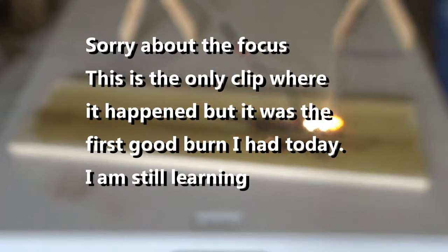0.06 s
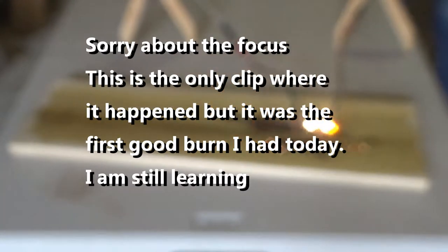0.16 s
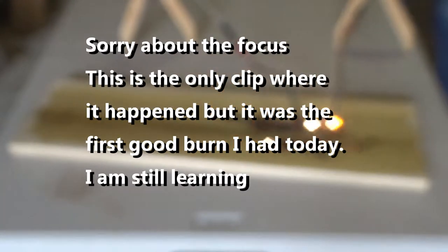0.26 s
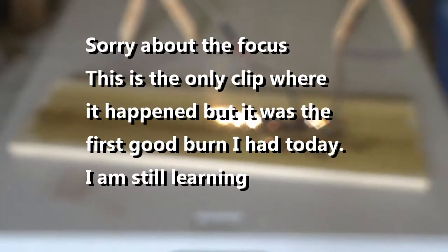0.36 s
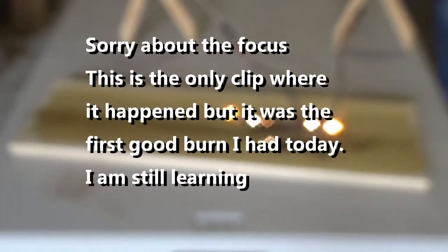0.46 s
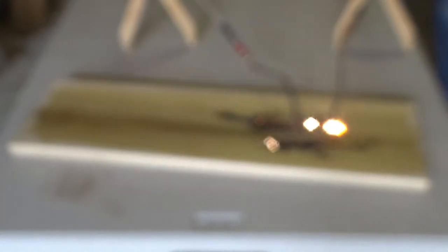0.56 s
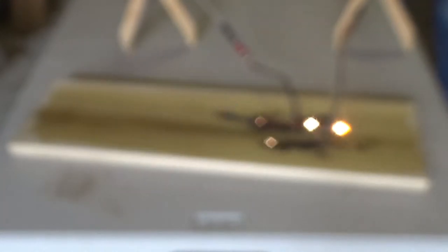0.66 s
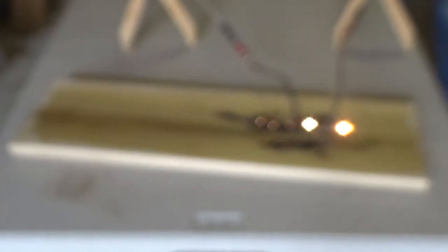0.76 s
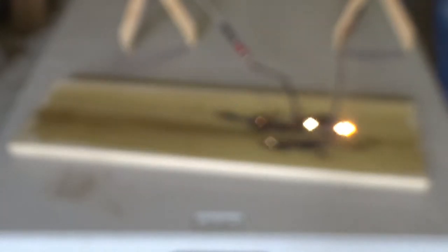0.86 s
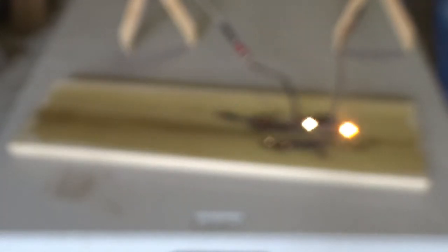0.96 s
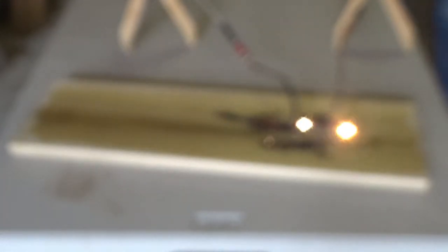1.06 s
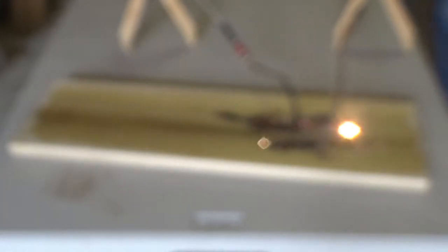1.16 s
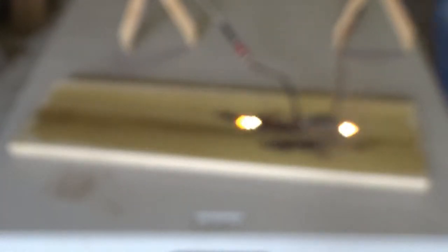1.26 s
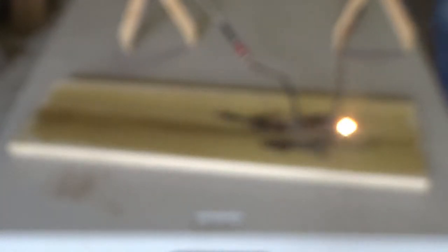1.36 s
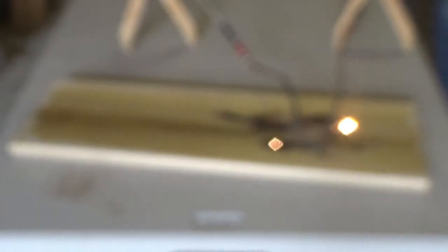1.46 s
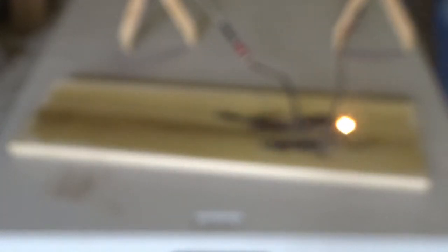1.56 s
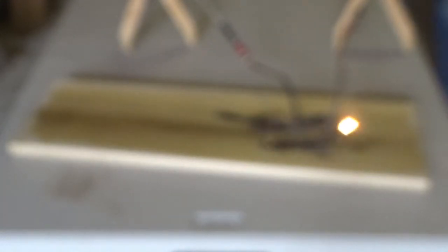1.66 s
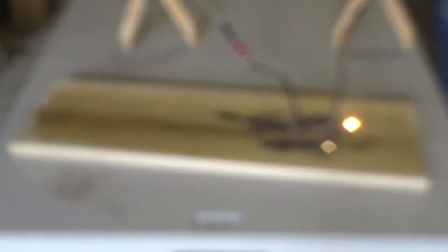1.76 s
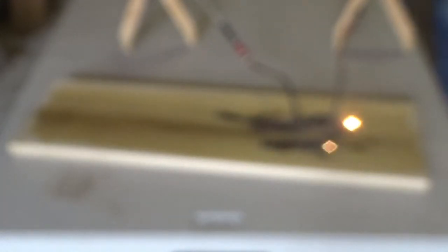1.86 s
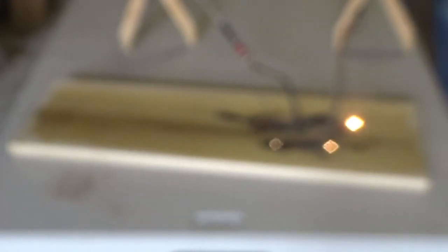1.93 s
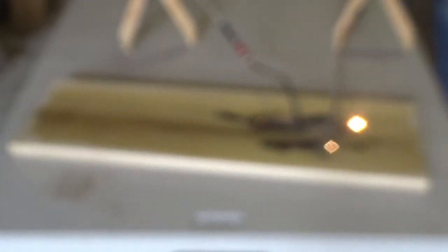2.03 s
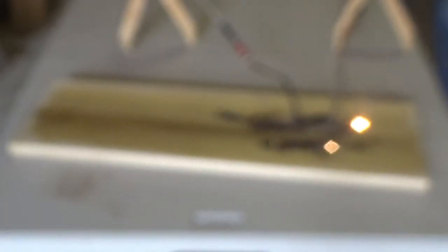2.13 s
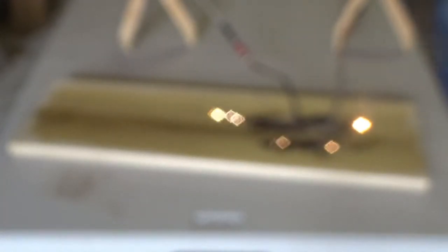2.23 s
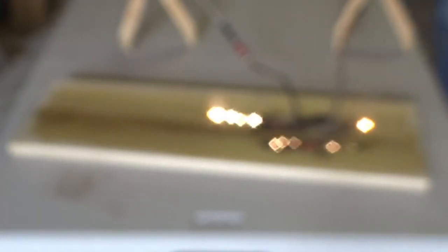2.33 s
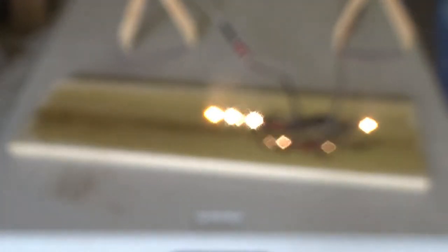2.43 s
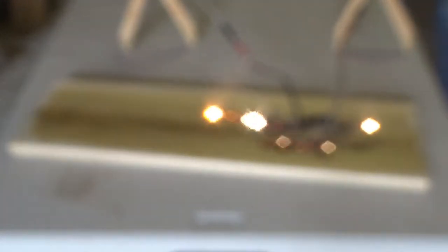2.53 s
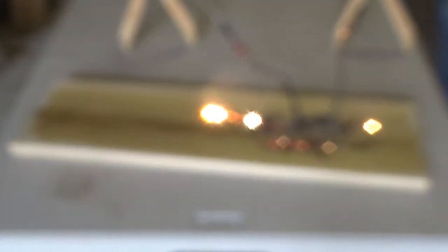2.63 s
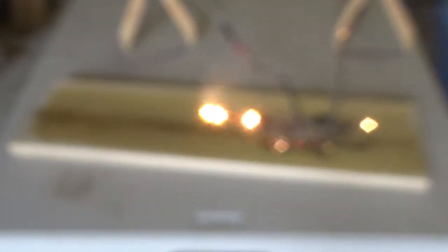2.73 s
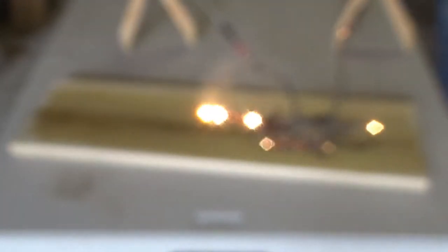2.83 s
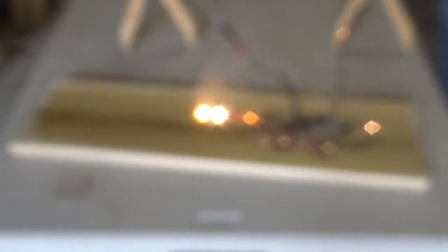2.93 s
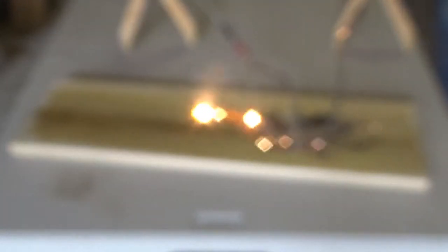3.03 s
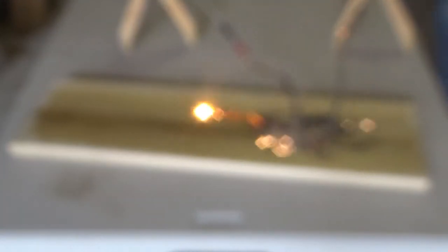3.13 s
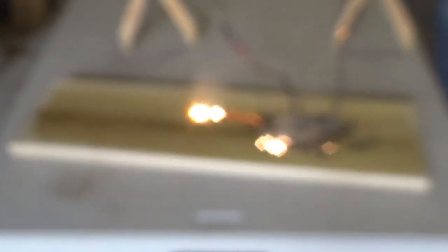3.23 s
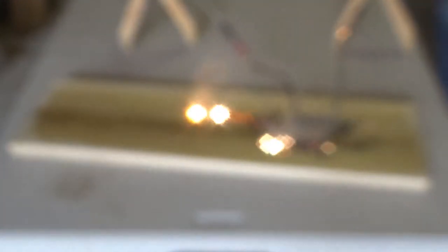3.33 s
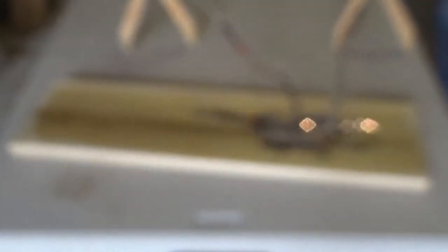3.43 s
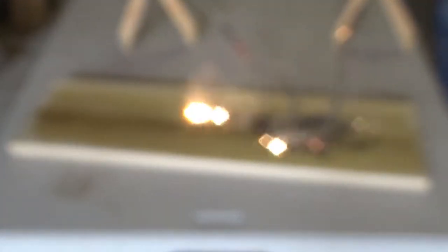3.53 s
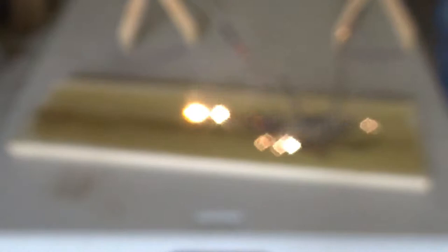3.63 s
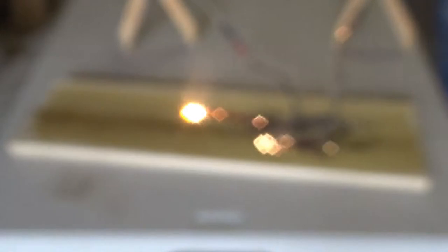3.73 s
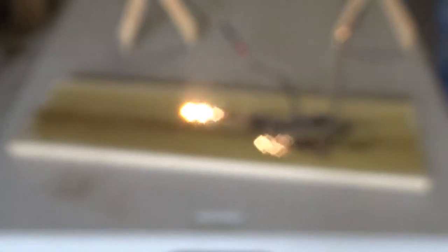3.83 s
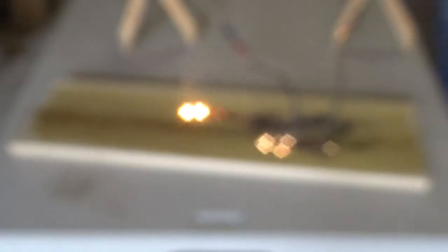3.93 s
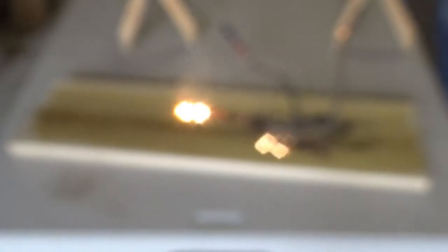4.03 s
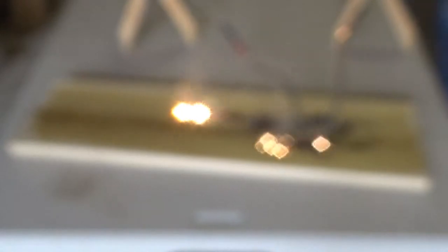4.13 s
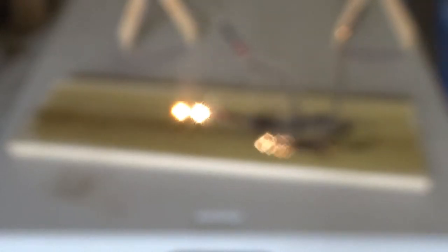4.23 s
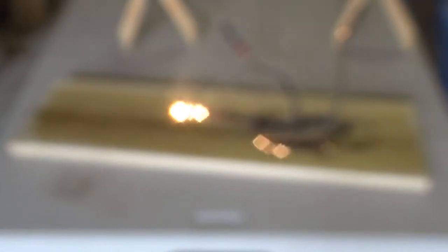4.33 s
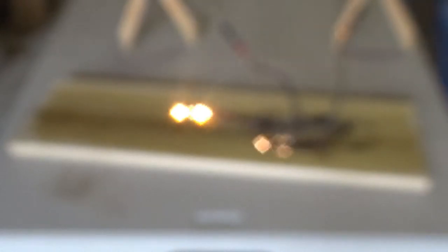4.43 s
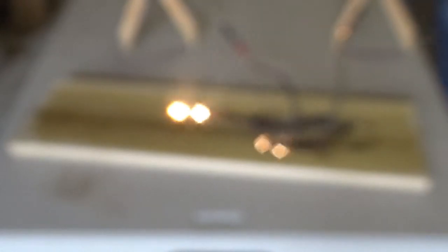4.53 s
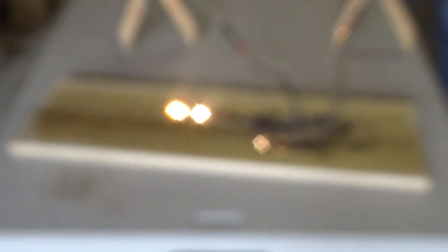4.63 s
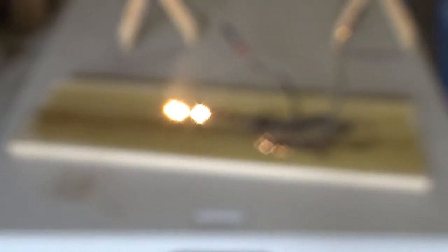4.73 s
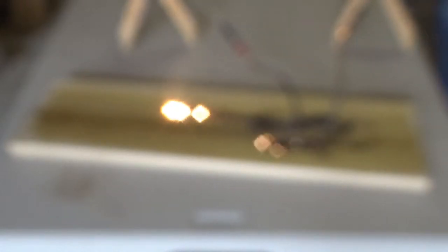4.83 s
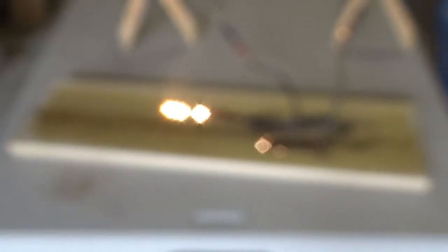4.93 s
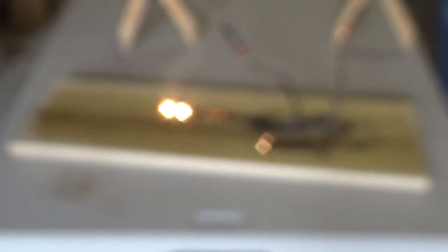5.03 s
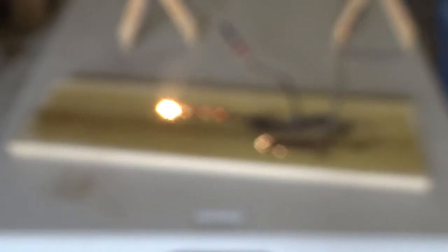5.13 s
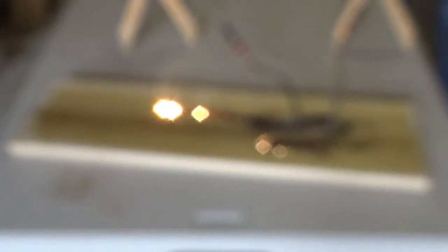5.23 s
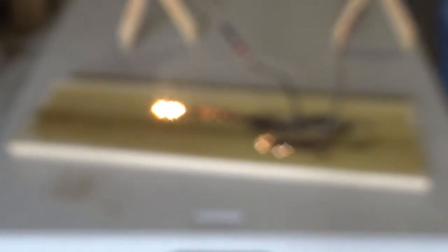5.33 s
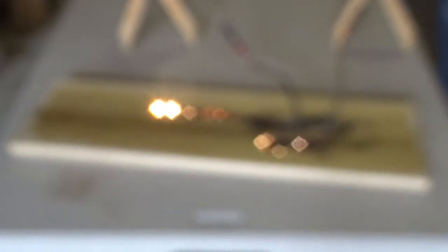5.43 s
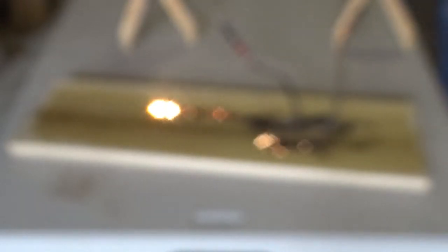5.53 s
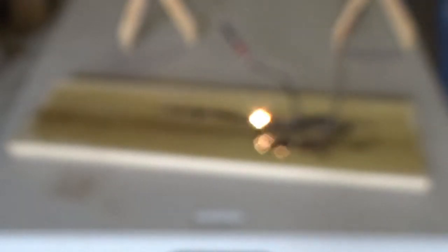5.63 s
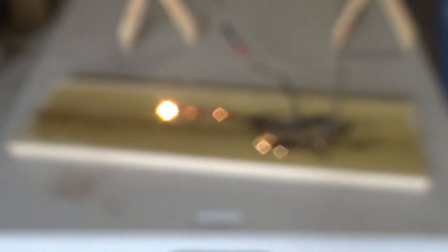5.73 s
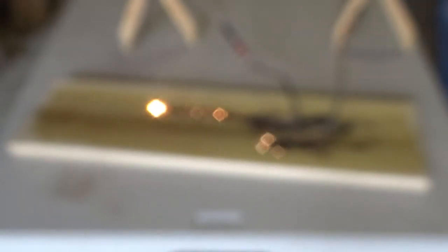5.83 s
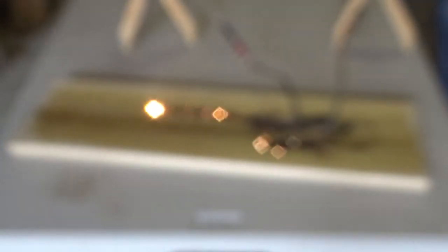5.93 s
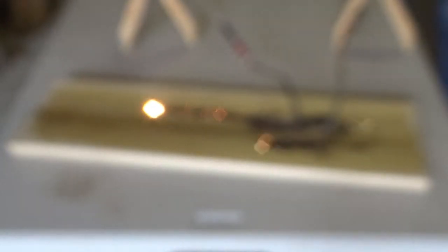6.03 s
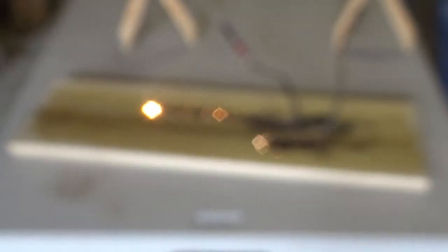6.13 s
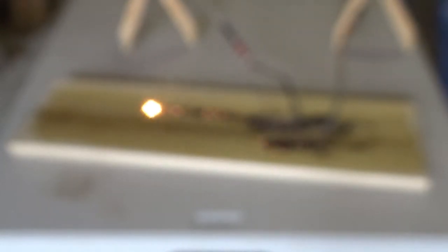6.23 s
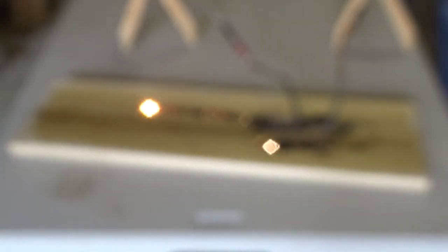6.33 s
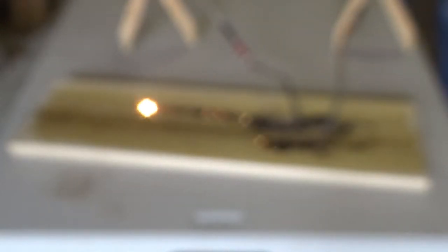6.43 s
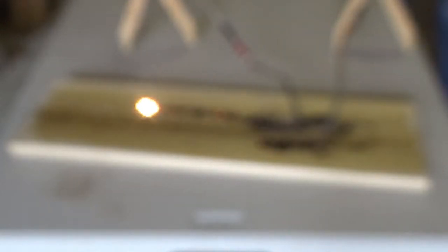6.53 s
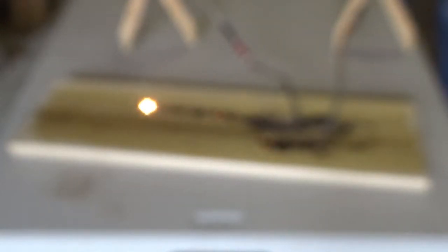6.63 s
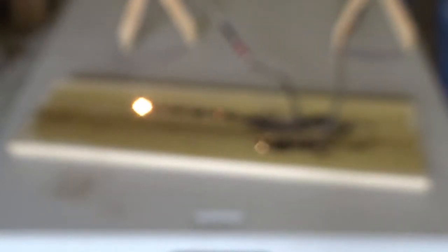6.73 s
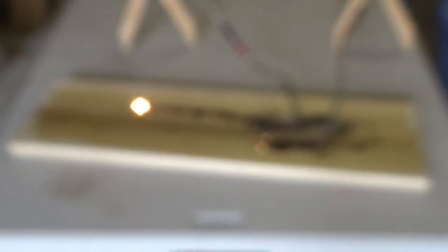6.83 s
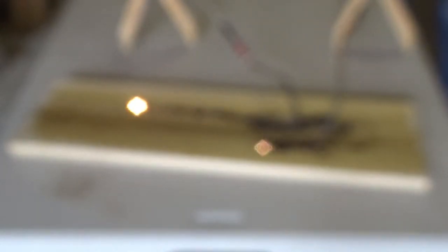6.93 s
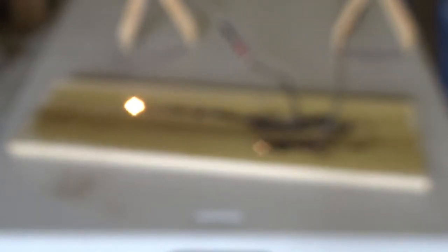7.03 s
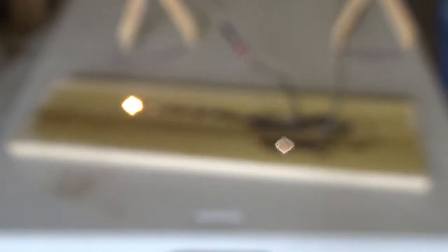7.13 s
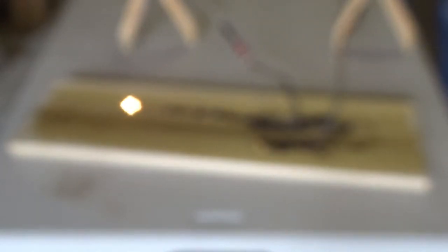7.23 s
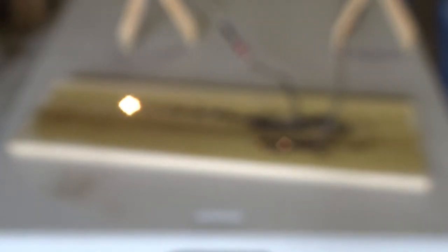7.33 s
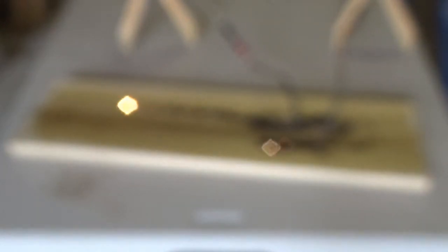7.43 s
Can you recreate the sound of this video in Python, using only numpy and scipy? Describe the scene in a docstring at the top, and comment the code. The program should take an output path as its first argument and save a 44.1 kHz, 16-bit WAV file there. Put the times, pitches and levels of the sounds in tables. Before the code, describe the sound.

In a small workshop, a high-voltage arc burns a wet board, heard close up. A steady, harsh electrical buzz carries bright, rapidly pulsing steam hiss and duller boiling sputter. Sharp tiny snaps pop irregularly. It eases, surges around two and a half seconds, drops out for an instant midway, restarts, then slowly weakens, leaving transformer hum over soft shop noise, low rumble and faint distant whines.

```python
"""A small workshop, where high voltage burns a track through a wet wooden board.
The arc buzzes as tones locked to its supply, and puffs of filtered noise and ticks make the hissing steam.
Duller noise is water boiling in the wood; millisecond bursts of noise are snaps in the char.
The arc goes out for an instant midway and dies down at the end, while the transformer hums on.
Behind it lie even shop noise, low rumble, soft thumps and faint gliding whines far off."""
import sys
import numpy as np
from scipy import signal
from scipy.fft import rfft, irfft
from scipy.io import wavfile

SR = 44100
rng = np.random.default_rng(int(sys.argv[2]) if len(sys.argv) > 2 else 0)


def unload_wav(signal):
    """Save mono or channel-first audio to the path in sys.argv[1] as 16-bit WAV at rate SR, clipped to [-1, 1]."""
    wavfile.write(
        sys.argv[1],
        SR,
        np.round(np.clip(np.atleast_2d(signal).T, -1, 1) * 32767).astype(np.int16),
    )


N = 329427

SUPPLY_HZ = 240
USUAL_BUZZ_DB, USUAL_HISS_DB = -53, -40   # reference levels that the arc's ups and downs are counted from


def from_db(db):
    """Turn decibels into an amplitude factor."""
    return 10 ** (np.asarray(db) / 20)


def rms_one(x):
    """Scale a sound to an rms level of 1."""
    return x / np.sqrt(np.mean(x ** 2) + 1e-20)


def seconds():
    """The time of every sample."""
    return np.arange(N) / SR


def in_time(rows):
    """The columns of a table, joined by straight lines in time."""
    s, *columns = np.transpose(rows)
    return [np.interp(seconds(), s, c) for c in columns]


def drift(rate_hz):
    """Slow random wandering of spread 1: noise smoothed twice, worked out at every 40th sample."""
    step = 40
    r = np.exp(-2 * np.pi * rate_hz * step / SR)
    noise = rng.standard_normal(N // step + 2002)
    slow = signal.lfilter([1], [1, -2 * r, r * r], noise)[2000:]   # skip the filter's start
    return np.interp(np.arange(N) / step, np.arange(len(slow)), rms_one(slow))


def colour(x, spectrum):
    """Filter with the given spectrum that answers as early as it can (minimum phase)."""
    hz, db = np.transpose(spectrum)
    grid = np.maximum(np.linspace(0, SR / 2, 2049), 1)
    gain = from_db(np.interp(np.log(grid), np.log(hz), db))
    cepstrum = irfft(np.log(gain))
    # folding the cepstrum onto its first half moves the energy to the front
    folded = rfft(2 * cepstrum[:len(grid)], len(cepstrum)) - cepstrum[0]
    response = irfft(np.exp(folded))
    return signal.fftconvolve(x, response)[:N]


def resonate(x, hz, width_hz):
    """One resonance with a gain of about 1 at its top."""
    r = np.exp(-np.pi * width_hz / SR)
    feed = np.array([1, 0, -1]) * (1 - r * r) / 2
    back = [1, -2 * r * np.cos(2 * np.pi * hz / SR), r * r]
    return signal.lfilter(feed, back, x + 1e-18)


def stereo_noise(spectrum, side_db):
    """Background noise, nearly alike on both sides."""
    mid, side = (rms_one(colour(rng.standard_normal(N), spectrum)) for _ in range(2))
    return mid + from_db(side_db) * side * [[1], [-1]]


def background(buzz_db):
    """Even shop noise, a low rumble that sinks with the arc, soft thumps, and a separate faint hiss on each side."""
    # spectrum of the shop noise: f/Hz, relative level/dB
    shop_spectrum = [(25, -11), (70, -12), (100, -3.5), (125, -6), (190, -1), (300, 2.5), (600, 2),
                     (1100, -1), (2300, 1.5), (4000, 0), (6500, -22), (15000, -30)]
    # soft low thumps: t/s, level/dB
    thump_rows = [(1.7, -72), (2.88, -69), (3.14, -69), (4.0, -69), (4.17, -64), (4.37, -65), (5.14, -66),
                  (5.56, -64), (6.1, -65)]
    rumble_spectrum = [(25, -21), (85, -7), (130, 22), (220, -7), (600, -35)]   # f/Hz, relative level/dB
    thump_spectrum = [(25, -5), (70, 5), (150, 4), (260, -4), (600, -49)]

    rumble_db = -76.5 + 0.28 * (buzz_db - USUAL_BUZZ_DB) + 1.9 * drift(5)
    rumble = from_db(rumble_db) * stereo_noise(rumble_spectrum, side_db=-24)
    swells = sum(from_db(db) * np.exp(-((seconds() - s) / 0.034) ** 2) for s, db in thump_rows)
    swells = swells + from_db(-83 + 5 * drift(5))   # weaker thumps at random
    thumps = swells * stereo_noise(thump_spectrum, side_db=-14)
    shop = from_db(-56) * stereo_noise(shop_spectrum, side_db=-17)
    faint_hiss = from_db(-61) * rng.standard_normal((2, N))
    return rumble + thumps + shop + faint_hiss


def whines():
    """Faint gliding tones that fade in and out, wavering in level and pitch."""
    # far-off whines, one list each: t/s, f/Hz, relative level/dB
    glides = [
        [(.2, 372, -66), (.75, 425, -64), (1.15, 467, -73), (1.4, 512, -62), (1.75, 560, -75)],
        [(.28, 572, -63), (.6, 585, -60), (.8, 572, -63), (1.2, 550, -70)],
        [(1.9, 460, -66), (2.08, 435, -64), (2.55, 458, -62), (2.9, 461, -63)],
        [(3.2, 382, -71), (4.2, 369.4, -67), (5.2, 366, -70), (6.4, 370, -65), (7.3, 365, -66)],
    ]
    fade_s = 0.069
    out = 0
    for rows in glides:
        hz, db = in_time(rows)
        to_nearest_end_s = np.minimum(seconds() - rows[0][0], rows[-1][0] - seconds())
        fade = np.clip(to_nearest_end_s / fade_s, 0, 1)
        level = fade * from_db(db + 2.2 * drift(7.6))
        turns = np.cumsum(hz + 1.43 * drift(10.5)) / SR
        out = out + level * np.sqrt(2) * np.sin(2 * np.pi * turns)
    return out


def room(x):
    """Countless echoes blur into noise that follows the power of each band and dies quickly."""
    # the blurred tail by band: from f/Hz, to f/Hz, level shared by both sides/dB, level differing between them/dB
    tail_bands = [(307, 1530, -20, -14), (1360, 5000, -8, -16), (3800, 8200, -12, -13),
                  (8350, 15000, -14, -10)]
    t60_s = 0.16   # time for the tail to fall by 60 dB
    out, keep = 0, from_db(-120 / (t60_s * SR))   # acts on power, so 120 here makes 60 dB
    for low, high, mid_db, side_db in tail_bands:
        band = signal.butter(2, [low, high], "band", fs=SR, output="sos")
        power = signal.lfilter([1 - keep], [1, -keep], signal.sosfilt(band, x) ** 2)
        mid, side = rms_one(signal.sosfilt(band, rng.standard_normal((2, N))))
        out = out + np.sqrt(power) * (from_db(mid_db) * mid + from_db(side_db) * side * [[1], [-1]])
    return out


def bench(x, count=14):
    """A few early echoes off the board and the bench comb the hiss with fine ridges."""
    lags_s = rng.uniform(.0008, .012, count)
    response = np.zeros(SR // 20)
    response[(lags_s * SR).astype(int)] = rng.choice([-1, 1], count) * np.exp(-lags_s / 0.023)
    echoes = signal.oaconvolve(x, response / np.linalg.norm(response))[:N]
    return from_db(-.9) * (x + .36 * echoes)


def partial(multiple, flutter_db):
    """A tone locked to the supply, fluttering in level."""
    turns = np.round(multiple) * SUPPLY_HZ * seconds() + rng.random()
    return np.sqrt(2) * np.sin(2 * np.pi * turns) * from_db(flutter_db * drift(20.6))


def hum(buzz_db, flame_db, alight):
    """Arc and transformer swell twice a cycle, so even multiples lead; a tall flame feeds the fourth, starves the eighth."""
    # leading partials: multiple of the supply, level at the usual burn/dB, change per dB of buzz/dB,
    # change per dB of flame/dB, change per second as the track grows/dB
    leading = [(2, -53, 1, 0, 0), (4, -55.5, 0, 1, 0), (6, -51.5, 0.9, -0.2, 0.42),
               (8, -55.5, 0.87, -0.53, 0), (10, -54, .6, 0.02, 0.1), (12, -60, 1.5, -.5, 1.14),
               (14, -55.5, 0, .53, 0.37)]
    # faint partials: multiple of the supply, level at the usual buzz/dB, change per dB of buzz/dB
    faint = [(3, -67.5, .2), (5, -66, 1.2), (9, -66, 1.5), (11, -68, 1), (13, -62.5, 1.5), (15, -66.5, 1.1),
             (17, -68.5, 1.5), (19, -66.5, 1.6), (23, -67.5, 1.4), (25, -67, 1.1)]
    usual_flame_db, mid_burn_s = -55, 3.7
    # while the arc is out, buzz and flame drop by these amounts
    out_buzz_drop_db, out_flame_drop_db = 10, 13.5

    drive_db = buzz_db - USUAL_BUZZ_DB - out_buzz_drop_db * (1 - alight)
    blaze_db = flame_db - usual_flame_db - out_flame_drop_db * (1 - alight)
    tones = 0
    for multiple, db, per_buzz, per_flame, db_per_s in leading:
        growth_db = db_per_s * (seconds() - mid_burn_s)
        level_db = db + per_buzz * drive_db + per_flame * blaze_db + growth_db
        flutter_db = 1.35 + 0.0591 * multiple   # higher partials flutter more
        tones = tones + from_db(level_db) * partial(multiple, flutter_db)
    for multiple, db, per_buzz in faint:
        tones = tones + from_db(db + per_buzz * drive_db) * partial(multiple, flutter_db=2.0)
    return tones


def snaps():
    """A pocket bursting in the char is a millisecond of noise with a pitch of its own."""
    # bursting pockets: t/s, relative peak level/dB, centre f/Hz
    pockets = [(0.0927, -14, 9430), (0.2678, -19, 13900), (0.5352, -12, 8010), (0.85, -18, 5060),
               (1.3034, -16, 6300), (1.7124, -16, 9600), (1.931, -18, 7000), (2.0887, -18, 8900),
               (2.399, -17, 8090), (3.5513, -15, 10840), (3.81, -17, 7500), (4.0556, -13, 8070),
               (4.9262, -16, 14000), (4.9342, -15, 6400), (6.005, -17, 14200), (6.118, -11.5, 9500),
               (6.1472, -12, 9600), (6.2384, -12, 9610), (6.2768, -13.5, 6460), (6.384, -13, 6500),
               (6.5221, -16, 6460), (6.8092, -22, 1910)]
    out, t = np.zeros(2 * N), np.arange(SR // 200) / SR
    for (s, db, hz), noise in zip(pockets, rng.standard_normal((len(pockets), len(t)))):
        envelope = t * np.exp(-t / 0.00038)
        burst = resonate(noise * envelope, min(hz, SR / 3), width_hz=5500)
        at = round((s + 0.00059) * SR)   # starts a touch after the listed time
        out[at:at + len(t)] += from_db(db - 6.0) * burst / np.abs(burst).max()
    return out[:N]


def flares():
    """Pockets of sap flare up, swelling and sinking smoothly; gives the wet and dry parts of the swell in dB."""
    # flares: centre t/s, length/s, swell/dB, wetness from 0 to 1
    sap_pockets = [(0.157, 0.055, 2.4, 0), (.27, 0.046, 2.5, 0.1), (0.422, 0.13, 5, 0.86),
                   (0.536, 0.02, 5, 1), (.85, 0.07, 3.5, .6), (1.19, .05, 2.5, 1), (1.31, 0.054, 4.5, 1),
                   (1.48, 0.056, 2.5, 0.4), (1.696, 0.11, 5, 0.94), (2.18, .04, 5, .7),
                   (2.694, .04, 2.1, 1), (3.441, .07, 3.3, 1), (3.695, .04, 1, 1),
                   (3.784, 0.056, 1.5, 0.55), (4.036, 0.081, 2.5, 0.4), (4.187, .06, 3.5, 0.8),
                   (4.37, 0.057, 4.5, 0.56), (4.51, 0.13, 5.5, 0.7), (5.136, 0.057, 2, 0.9),
                   (5.567, 0.054, 1.7, 1), (6.238, .06, 3, 0.4), (6.535, .04, 2.1, .6)]
    wet_db = dry_db = 0
    for s, length, db, wetness in sap_pockets:
        swell_db = db * np.exp(-(2 * (seconds() - s) / length) ** 2)
        wetness = np.clip(wetness, 0, 1)
        wet_db = wet_db + wetness * swell_db
        dry_db = dry_db + (1 - wetness) * swell_db
    return wet_db, dry_db


def grains(per_s, spread_db):
    """Tiny bursts at random moments, a few much larger than the rest."""
    sizes = from_db(spread_db * np.minimum(rng.exponential(1, N), 5)) * rng.choice([-1, 1], N)
    return rms_one(sizes * (rng.random(N) < per_s / SR))


def puffing(uneven_db, between):
    """Each half cycle gives one puff that rises fast and sinks; most are modest, a few spit hard."""
    # puffs in one cycle, one polarity boiling harder: start/cycles, length/cycles, relative level/dB
    half_cycles = [(.42, 0.44, -1), (.92, 0.19, -7)]
    out = between   # the steady flow left between puffs
    for start, length, db in half_cycles:
        count, phase = np.divmod(SUPPLY_HZ * seconds() + 1 - start, 1)
        shape = np.sin(np.pi * np.minimum(phase / length, 1) ** 0.63).clip(0) ** 0.54
        strength_db = uneven_db * np.minimum(rng.exponential(1, N // 100), 3.5)
        out = out + shape * from_db(db + strength_db)[count.astype(int)]
    return rms_one(out)


def sputter(sputter_db):
    """Water boiling deeper in the wood: duller and more even than the jet."""
    # spectrum of the boiling: f/Hz, relative level/dB
    boil_spectrum = [(100, -37.5), (220, -20.5), (400, -10), (560, -7.5), (800, -6), (1200, -6.5),
                     (1800, -2.5), (2700, -2), (3600, -2.5), (5000, -4.5), (9000, -17)]
    noise = rng.standard_normal(N) + 0.63 * grains(per_s=1400, spread_db=2.0)
    boil = noise * puffing(uneven_db=3.5, between=0.72)
    return from_db(sputter_db + 1.76 * drift(22)) * rms_one(colour(boil, boil_spectrum))


def strikes(spread_db, jitter):
    """The gap breaks down anew on every half cycle with a sharp tick, its size and sign left to chance."""
    cycles = np.arange(0, N / SR * SUPPLY_HZ - 1, .5)
    late, size, sign = rng.standard_normal((len(cycles), 3)).T
    at = ((cycles + .05 + jitter * late) * SR / SUPPLY_HZ).astype(int).clip(0, N - 1)
    out = np.zeros(N)
    out[at] = np.sign(sign) * from_db(spread_db * np.minimum(size, 2))
    return rms_one(out)


def steam(hiss_db, top_db, puffs):
    """Sap flashes to steam in puffs, with crackle and ticks; the burnt groove rings along."""
    # spectrum of the steam: f/Hz, relative level/dB
    hiss_spectrum = [(1200, -21), (2500, -13), (4000, -5), (5500, -0.5), (6700, 1.5), (8300, 0),
                     (10500, -3.5), (12500, -3.5), (15500, -1)]
    # narrow resonances of the burnt groove: f/Hz, width/Hz, relative level/dB
    groove_rows = [(6470, 130, -3), (6760, 80, -4), (8110, 90, -4), (8840, 200, -8), (9590, 110, -3),
                   (11600, 70, -4), (12400, 110, -6)]
    # how strongly the groove rings along: t/s, level/dB
    depth_rows = [(0, -9), (2.2, -9), (3.6, -1), (6.5, 0), (7.4, -6)]

    sizzle = (rng.standard_normal(N) + 0.52 * grains(per_s=1400, spread_db=1.5)) * puffs
    jet = colour(sizzle + .42 * strikes(spread_db=6.0, jitter=.05), hiss_spectrum)
    ringing = sum(from_db(db) * resonate(jet, hz, width) for hz, width, db in groove_rows)
    jet = rms_one(jet + from_db(in_time(depth_rows)[0]) * ringing)
    # a fine, dry puff is brighter than a wet one, and no two are equally wet
    body = signal.sosfiltfilt(signal.butter(3, 9500, fs=SR, output="sos"), jet)
    top = jet - body
    brighter_db = top_db + 5.0 + 1.0 * drift(84)
    tilted = body * from_db(-.6 * brighter_db) + top * from_db(1.17 * brighter_db)
    return from_db(hiss_db + 1.0) * tilted


def boiling(buzz_db, hiss_db, wet_db, dry_db):
    """A stronger arc boils harder; a wet flare sputters and dulls the jet, a dry one brightens it."""
    boil_db = hiss_db - USUAL_HISS_DB
    drive_db = buzz_db - USUAL_BUZZ_DB
    top_db = -3.5 - .08 * boil_db - 0.39 * wet_db + 1.06 * dry_db
    sputter_db = -48 + 0.75 * boil_db + 0.43 * drive_db + 1.3 * wet_db
    puffs = puffing(uneven_db=1.5, between=0.058) * from_db(1.0 * drift(28))
    return steam(hiss_db + 0.43 * wet_db + dry_db, top_db, puffs) + sputter(sputter_db)


def scene():
    """The burning tip, heard with its bench and room, over the background of the shop."""
    # strength of the burn without its flares: t/s, buzz level/dB, hiss level/dB, flame tone level/dB
    arc_rows = [(0.0, -52, -38, -51.5), (0.42, -50.5, -39.5, -49), (1.1, -54, -41, -55.5),
                (1.7, -55, -41.7, -57.2), (2.0, -54.8, -43.5, -60), (2.34, -55.2, -43, -63.5),
                (2.62, -47.9, -36.1, -48), (3.1, -49.5, -35.5, -47), (3.75, -49, -36.5, -48),
                (4.3, -50.8, -39, -50), (4.92, -52.5, -38, -50), (5.12, -52, -38.5, -57.5),
                (5.8, -53.5, -39.5, -57.5), (6.3, -54, -39.5, -59.4), (6.58, -57, -40.5, -66),
                (6.9, -58.5, -44.5, -67), (7.32, -61.5, -48.5, -67.9), (7.47, -65, -59, -69)]
    # the arc goes out and strikes again: t/s, share alight from 0 to 1
    alight_rows = [(3.471, 1), (3.475, 0), (3.537, 0), (3.541, .3), (3.551, 1)]
    # the burning tip creeps to the left: t/s, left minus right/dB
    place_rows = [(0, -.6), (2.1, -.6), (2.7, .1), (7.4, .5)]

    buzz_db, hiss_db, flame_db = in_time(arc_rows)
    wet_db, dry_db = flares()
    alight = in_time(alight_rows)[0]
    burn = alight * boiling(buzz_db, hiss_db, wet_db, dry_db) + snaps()
    pan = from_db(in_time(place_rows)[0] * [[.5], [-.5]])
    near = bench(burn) + room(burn) + hum(buzz_db, flame_db + 0.82 * wet_db, alight)
    return pan * near + from_db(-2.5) * whines() + background(buzz_db)


def record(dry):
    """A steep filter takes away the treble above its cutoff."""
    cutoff_hz = 15800
    lowpass = signal.firwin(601, cutoff_hz, window=("kaiser", 9), fs=SR)
    return signal.fftconvolve(dry, lowpass[None], "same", axes=1)


dry = scene()
out = record(dry)
unload_wav(out)
```